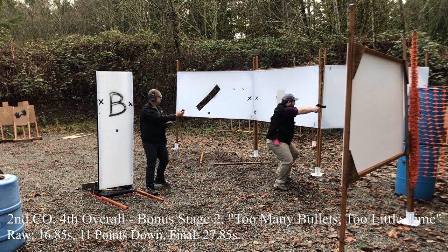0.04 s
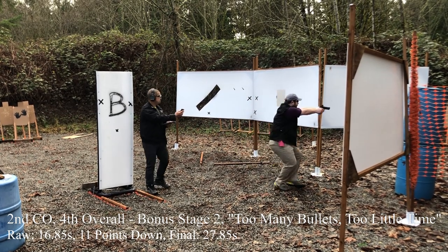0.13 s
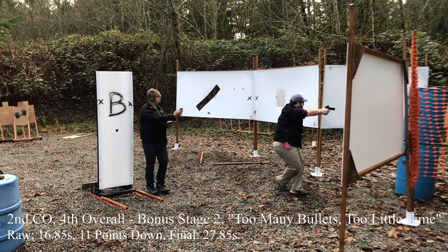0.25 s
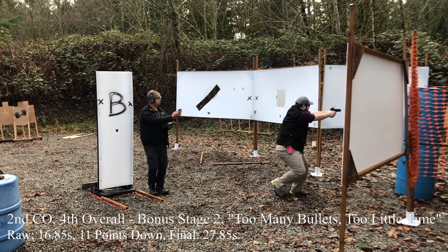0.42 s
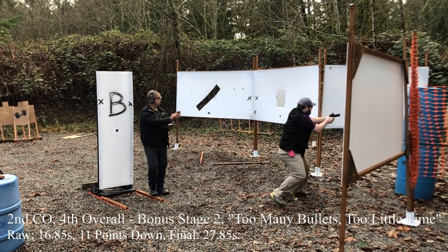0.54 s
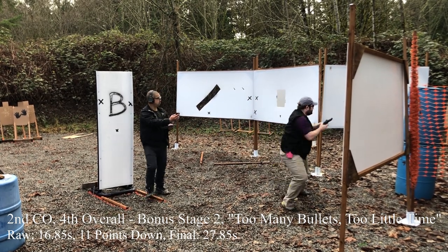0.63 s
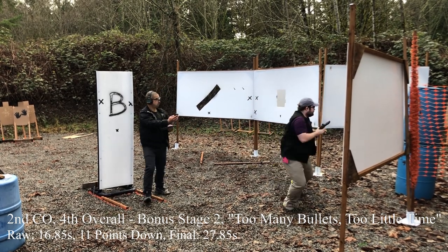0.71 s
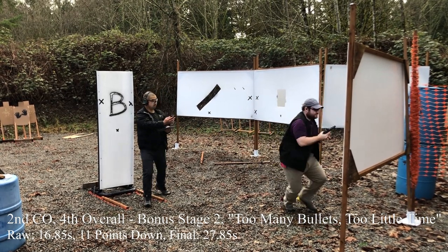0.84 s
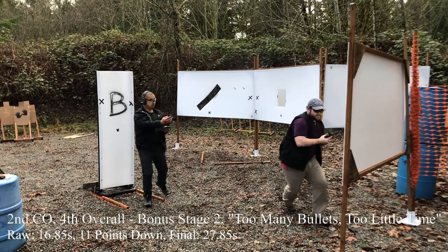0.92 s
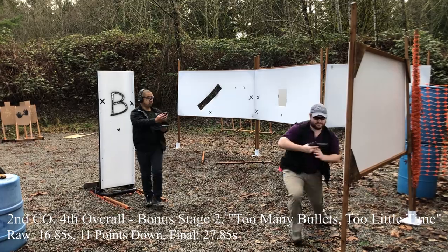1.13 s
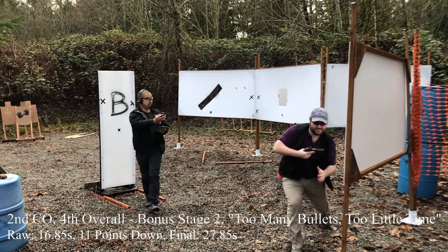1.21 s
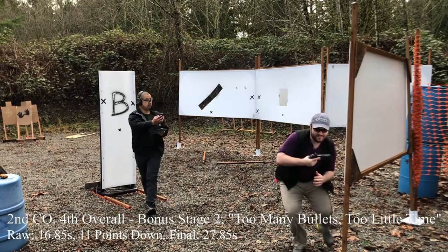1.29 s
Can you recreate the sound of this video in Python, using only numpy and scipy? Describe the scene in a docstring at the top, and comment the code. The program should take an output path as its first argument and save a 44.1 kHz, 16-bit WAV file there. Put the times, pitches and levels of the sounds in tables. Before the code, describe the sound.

Two handgun shots a fifth of a second apart, loud and sharp, slapping off nearby walls and rolling back from berms and trees; afterwards scuffing steps on gravel, heard outdoors from a microphone several metres away.

```python
"""Two quick handgun shots in an outdoor range bay: dispersed blast waves with noise bursts and ringing boards.
Each slaps off the target walls as short noise clusters and rolls back from berms and woods as decaying noise.
A brief noise swell leads into the first shot. Shoes scuff and step on gravel as bursts of random
grains, with knocking soles and clicking stones, over the coloured noise of quiet outdoor air."""
import sys
import numpy as np
from scipy import signal
from scipy.fft import rfft, irfft, next_fast_len
from scipy.io import wavfile
from scipy.ndimage import map_coordinates

SR = 44100
rng = np.random.default_rng(int(sys.argv[2]) if len(sys.argv) > 2 else 0)


def transcribe(signal):
    """Save signal, clipped to [-1, 1], as a 16-bit WAV file at the path in sys.argv[1]."""
    frames = np.atleast_2d(signal).T
    limited = np.clip(frames, -1, 1)
    pcm = np.round(limited * 32767).astype(np.int16)
    wavfile.write(sys.argv[1], SR, pcm)


N = 59535
T = np.arange(N) / SR
SIZE = next_fast_len(2 * N)  # zero padding keeps the filters from wrapping round
HZ = np.fft.rfftfreq(SIZE, 1 / SR)

FIRST_S, SECOND_S = .2378, .4519  # start times of the two shots
# The two shots, with relative levels of their parts:
# start_s, blast_db, crack_db, thump_db, ring_db, echo_peak_delay_s, echo_db
SHOTS = [(FIRST_S, 0.92, 0.73, 0, 0, 0.08, 0.18), (SECOND_S, -3.5, -16.5, -1.5, -9.5, 0.048, 0.99)]


def amp(db):
    """Level to amplitude: 20 dB is a factor of ten."""
    return 10 ** (np.asarray(db) / 20)


def unit(x):
    """Normalization of a signal to rms 1."""
    return x / np.sqrt(np.mean(x ** 2) + 1e-20)


def along(points, hz=HZ):
    """Interpolation of (frequency, value) points on a logarithmic frequency axis."""
    point_hz, values = np.transpose(points)
    return np.interp(np.log(hz + 1), np.log(point_hz + 1), values)


def filtered(x, response):
    """Linear filtering: the spectrum times a frequency response."""
    return irfft(rfft(x, SIZE) * response, SIZE)[:N]


def noise(spectrum):
    """Spectral shaping: white noise filtered to a colour, at rms 1."""
    white = rng.standard_normal(N)
    return unit(filtered(white, amp(along(spectrum))))


def fade(t, t60):
    """Exponential decay by 60 dB in t60 seconds from t = 0, silent before."""
    return (t >= 0) * np.exp(-np.log(1000) * np.maximum(t, 0) / t60)


def swell(t, rise_s, t60):
    """Attack and decay: a straight rise that peaks at t = 0, then an exponential fall."""
    return np.clip(t / rise_s + 1, 0, 1) * fade(np.maximum(t, 0), t60)


def roll(s, spectrum, t60s, peak_s, start_db):
    """Diffuse reverberation: uneven noise swells to a peak, then each band decays at its own rate."""
    scatter_per_s, scatter_db = 700, 1.8
    knots = rng.standard_normal(int(N * scatter_per_s / SR) + 4)
    lumps = amp(scatter_db * map_coordinates(knots, [T * scatter_per_s]))
    scattered = unit(noise(spectrum) * lumps)
    hz, t, bands = signal.stft(scattered, SR, nperseg=256)
    age = t - s - peak_s  # time since the peak
    build_up = amp(start_db * np.clip(-age / peak_s, 0, 1))
    decay = fade(np.maximum(age, 0), along(t60s, hz)[:, None])
    tail = signal.istft(bands * build_up * decay, SR, nperseg=256)[1][:N]
    return tail * np.clip((T - s) / 0.00092, 0, 1)  # silent before the onset


def air():
    """Steady broadband ambience: coloured noise whose level slowly sinks."""
    # Colour of the outdoor air: frequency_hz, relative_level_db
    air_colour = [(25, -11), (50, -14), (88, 6.5), (140, -2), (250, -1.5), (600, 3.5), (1100, 0.5),
                  (2500, -10), (6000, -16), (15000, -22.5)]
    level_db, fall_db_per_s = -57, 3
    return amp(level_db - fall_db_per_s * T) * noise(air_colour)


def lead_in_swell():
    """Shaped noise: a brief uneven swell leads into the first shot, then decays band by band."""
    # Colour of the swell: frequency_hz, relative_level_db
    swell_colour = [(30, -35), (150, -4), (400, 13.5), (600, -3), (1100, 4), (2100, -20.5), (3100, 2.5),
                    (4000, -17), (8000, -22.5), (15000, -23)]
    # Its decay: frequency_hz, t60_s
    swell_t60s = [(100, 0.11), (10000, 0.049)]
    start_s, level_db, peak_delay_s = .2145, -22, .022
    return amp(level_db) * roll(start_s, swell_colour, swell_t60s, peak_delay_s, start_db=-11)


def gravel():
    """Granular impact: dense random grains over dull heel noise, with knocking soles and clicking stones."""
    # Footfalls and scuffs: peak_s, rise_s, t60_s, crunch_db, heel_db
    steps = [(.003, 0.009, 0.16, -86, -50.5), (0.055, 0.022, .08, -59, -49), (.765, 0.017, .2, -56, -69),
             (0.964, 0.016, .1, -45, -49.5), (0.981, 0.019, 0.13, -43.5, -44.5),
             (1.035, 0.029, 0.31, -50, -56), (1.18, .02, 0.37, -63.5, -56.5),
             (1.236, 0.017, 0.12, -46.5, -39), (1.315, 0.0087, 0.18, -53, -54.5)]
    # Colours of the grains, the heel and the stones: frequency_hz, relative_level_db
    crunch_colour = [(40, -40), (300, -7), (1500, 6), (4000, 0), (7000, 6), (15000, 5)]
    heel_colour = [(30, -40), (120, -9), (300, -2), (600, -1), (1200, 0), (2000, -4), (2600, -13),
                   (5000, -12.5), (12000, -18)]
    stone_colour = [(40, -35), (150, -15), (350, 2), (1500, -11), (3000, -10.5), (4500, 0.5), (7000, -10),
                    (15000, -4.5)]
    # Soles knocking on the ground: start_s, pitch_hz, level_db
    knocks = [(0.954, 450, -44), (0.983, 1080, -36.5), (1.229, 570, -41.5)]
    # Single stones clicking under the shoes: start_s, level_db, t60_s
    stones = [(0.172, -40.5, .03), (0.1759, -36.5, 0.023), (0.192, -54, 0.046), (0.1965, -42, 0.036),
              (.9085, -55, 0.0086), (0.984, -43, 0.0099), (1.2003, -49, .015), (1.3027, -45, .015),
              (1.3122, -51, 0.0089), (1.3194, -60, 0.03)]
    grains_per_s, grain_spread_db, knock_t60_s = 3500, 3, 0.032

    out = np.zeros(N)
    for s, rise_s, t60, crunch_db, heel_db in steps:
        hits = rng.random(N) < grains_per_s / SR
        sizes = rng.standard_normal(N) * amp(grain_spread_db * rng.standard_normal(N))
        crunch = unit(filtered(hits * sizes, amp(along(crunch_colour))))
        footfall = amp(crunch_db) * crunch + amp(heel_db) * noise(heel_colour)
        out += swell(T - s, rise_s, t60) * footfall
    for s, hz, db in knocks:
        out += amp(db) * np.sin(2 * np.pi * hz * (T - s)) * fade(T - s, knock_t60_s)
    clicks = sum(amp(db) * fade(T - s, t60) for s, db, t60 in stones)
    return out + noise(stone_colour) * clicks


def surroundings():
    """Late reflection: the berms answer loudly and briefly, the woods with a long, quiet tail."""
    # Colours of the echoes: frequency_hz, relative_level_db
    berm_colour = [(25, -18), (80, -7), (170, -18.5), (240, -4.5), (320, -16.5), (420, -1.5), (650, -1),
                   (950, 1), (1500, -1.5), (2200, -10.5), (3300, -5.5), (4700, -9), (6500, -10),
                   (10000, -16), (15500, -20.5)]
    woods_colour = [(30, -6), (90, -24), (180, -14), (400, -1), (1100, -3.5), (2200, -9.5), (3500, -3.5),
                    (7000, -10.5), (15000, -15)]
    # Their decays: frequency_hz, t60_s
    berm_t60s = [(60, 0.36), (400, 0.39), (1200, 0.45), (4000, 0.39), (14000, 0.27)]
    woods_t60s = [(100, 0.71), (1000, 2.08), (4000, 1), (12000, 0.68)]
    # Each shot's echo_db adds to the common level; the woods are relative to the berms
    common_db, woods_db, woods_peak_s = -22, -15, 0.046

    out = np.zeros(N)
    for s, *_, peak_s, echo_db in SHOTS:
        berms = roll(s, berm_colour, berm_t60s, peak_s, start_db=-6)
        woods = roll(s, woods_colour, woods_t60s, woods_peak_s, start_db=-12.5)
        out += amp(common_db + echo_db) * (berms + amp(woods_db) * woods)
    return out


def walls():
    """Early reflection: walls and barrels throw back short, dull clusters of noise."""
    # Slaps off the walls: centre_s, level_db
    slaps = [(0.257, -36), (0.274, -27.5), (0.289, -18), (0.312, -25), (0.326, -26), (0.35, -25.5),
             (.473, -21), (0.495, -21), (0.503, -16), (0.515, -23.5), (.530, -25.5)]
    # Their colour: frequency_hz, relative_level_db
    slap_colour = [(40, -40), (150, -30), (240, -3.5), (320, -2.5), (600, 8), (1000, -0.5), (1550, 0.5),
                   (2200, -19.5), (3300, -13.5), (7000, -19), (15000, -45)]
    width_s = 0.0038
    clusters = sum(amp(db) * np.exp(-((T - s) / width_s) ** 2) for s, db in slaps)
    return noise(slap_colour) * clusters


def pressure_wave(s):
    """Dispersion: a blast wave of unit energy sweeps from treble to bass within a few milliseconds."""
    # Colour of the blast: frequency_hz, relative_level_db
    blast_colour = [(30, -62), (100, -26), (220, -36), (410, 3.5), (700, 0.5), (1100, 12.5), (1700, -7),
                    (3100, -5.5), (6000, -19), (15000, -28)]
    bass_lag_s, lag_hz = 0.004276, 994  # well below lag_hz the delay nears bass_lag_s
    phase = 2 * np.pi * (HZ * s + bass_lag_s * lag_hz * np.arctan(HZ / lag_hz))
    wave = irfft(amp(along(blast_colour)) * np.exp(-1j * phase), SIZE)[:N]
    return wave / np.linalg.norm(wave)


def handgun():
    """Impulsive radiation: blast wave, hissing crack, push and puff of gas, ringing boards, late low boom."""
    # Colours of the crack and of the billowing gas: frequency_hz, relative_level_db
    crack_colour = [(40, -40), (250, -5), (1000, 10), (3200, 4.5), (5400, 6), (6600, -5.5), (8500, 5),
                    (15000, -5.5)]
    puff_colour = [(40, -52), (250, -12.5), (640, 6.5), (950, -6), (1500, -1), (2300, -11), (3500, -5.5),
                   (4600, -29), (6000, -19), (15000, -23)]
    # Ringing of boards near the muzzle: pitch_hz, relative_level_db, t60_s
    ring_modes = [(424, -5, 0.052), (634, -16, 0.073), (1130, -5, 0.036), (3168, -11, .03)]
    # Common levels of blast, crack, thump and puff add to each shot's own
    common_blast_db, common_crack_db, common_thump_db, common_puff_db = 12, -7, -2.5, -16
    crack_t60_s = 0.016
    spray_db, spray_t60_s = -22, 0.087  # the crack scattered off the gravel
    thump_lag_s, thump_hz = 0.004144, 746
    puff_rise_s, puff_t60_s = .003, 0.047
    boom_hz, boom_db, boom_lag_s, boom_width_s = 92, -32, 0.021, 0.0058

    out = np.zeros(N)
    for s, blast_db, crack_db, thump_db, ring_db, *_ in SHOTS:
        t = T - s
        out += amp(common_blast_db + blast_db) * pressure_wave(s)

        crack = amp(common_crack_db + crack_db) * fade(t, crack_t60_s)
        spray = amp(spray_db) * fade(t, spray_t60_s)
        out += noise(crack_colour) * (crack + spray)

        pushed = t - thump_lag_s
        u = (np.pi * thump_hz * pushed) ** 2
        push = (1 - 2 * u) * np.exp(-u)  # one pulse between two dips
        out += amp(common_thump_db + thump_db) * push
        puff = noise(puff_colour) * swell(pushed, puff_rise_s, puff_t60_s)
        out += amp(common_puff_db + thump_db) * puff

        for hz, db, t60 in ring_modes:
            onset = np.clip(t * hz, 0, 1)  # grows over the first cycle
            out += amp(ring_db + db) * np.sin(2 * np.pi * hz * t) * fade(t, t60) * onset

        late = t - boom_lag_s
        boom = np.sin(2 * np.pi * boom_hz * late) * np.exp(-(late / boom_width_s) ** 2)
        out += amp(boom_db) * boom
    return out


def scene():
    """Superposition: outdoor air, lead-in swell, steps, echoes and shots add linearly."""
    background = air() + lead_in_swell() + gravel()
    return (background + surroundings() + walls() + handgun())[None]


def record(dry):
    """Saturation and band limits: the microphone rounds off peaks, sheds deep bass and cuts the top."""
    clip_level, low_cut_hz, top_hz = .95, 36, 15900
    squashed = dry[0] / (1 + np.abs(dry[0] / clip_level) ** 6) ** (1 / 6)
    low_cut = signal.butter(2, low_cut_hz, "highpass", fs=SR, output="sos")
    thinned = signal.sosfilt(low_cut, squashed)
    return filtered(thinned, HZ < top_hz)[None]


dry = scene()
out = record(dry)
transcribe(out)
```